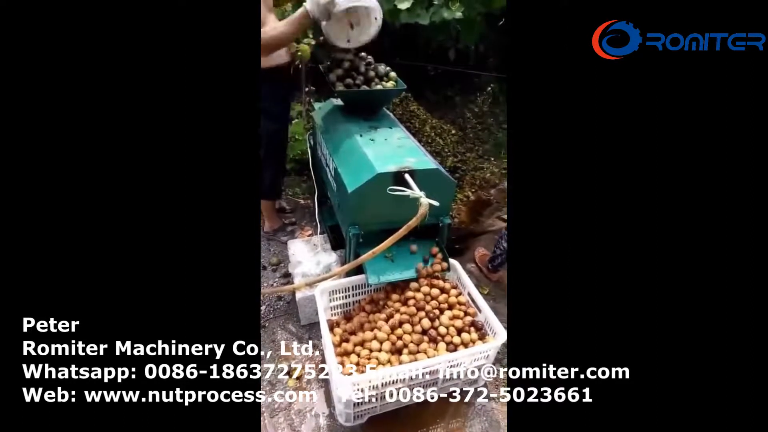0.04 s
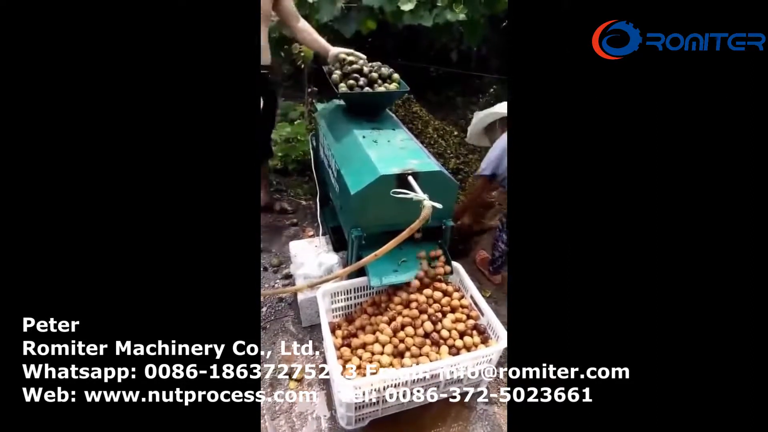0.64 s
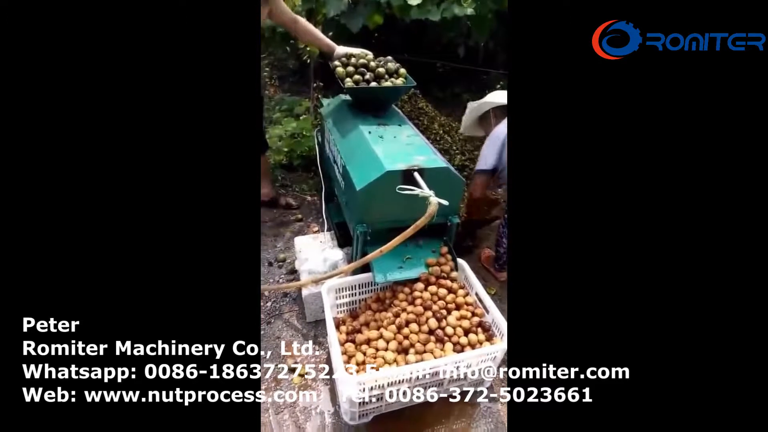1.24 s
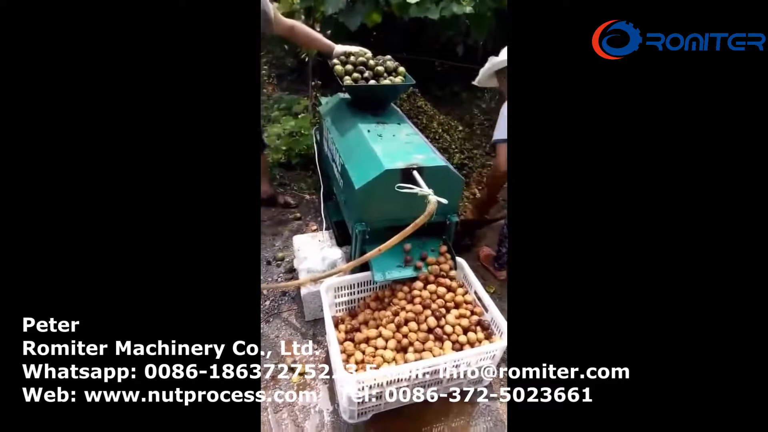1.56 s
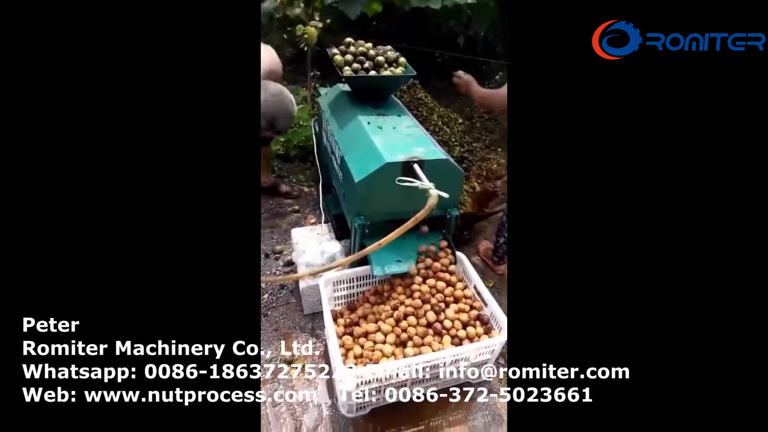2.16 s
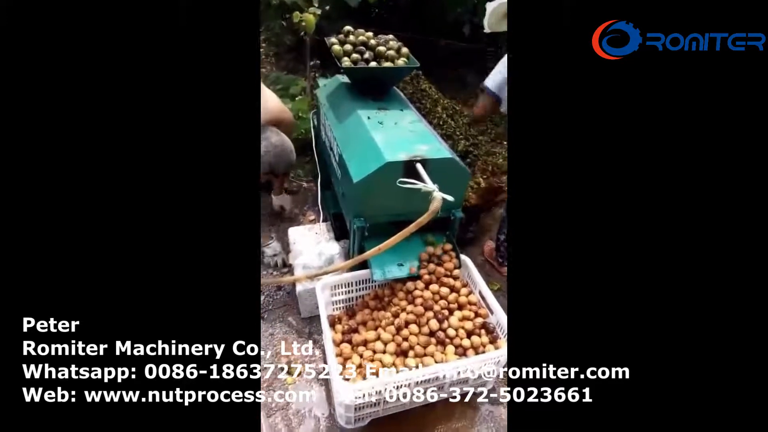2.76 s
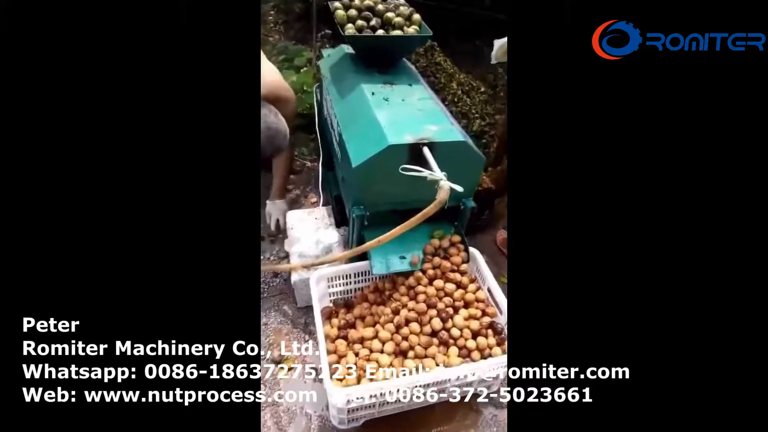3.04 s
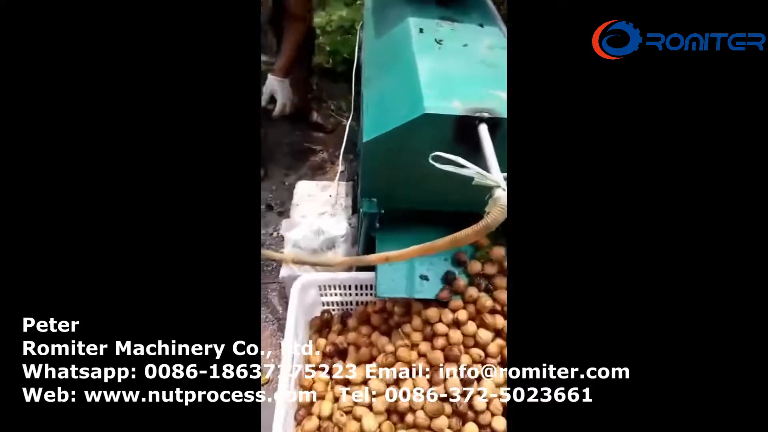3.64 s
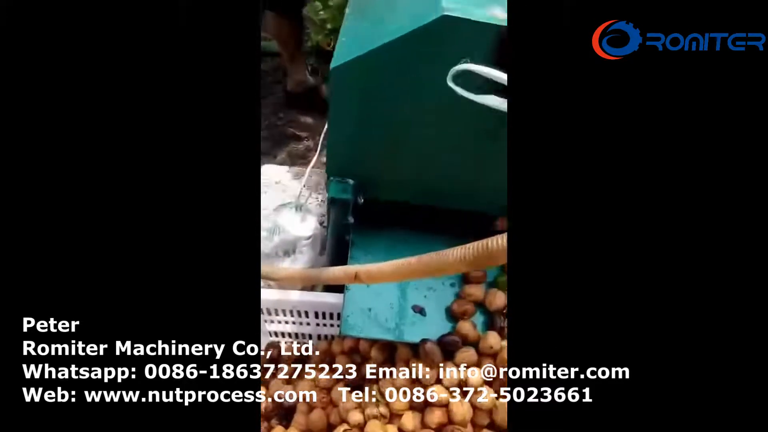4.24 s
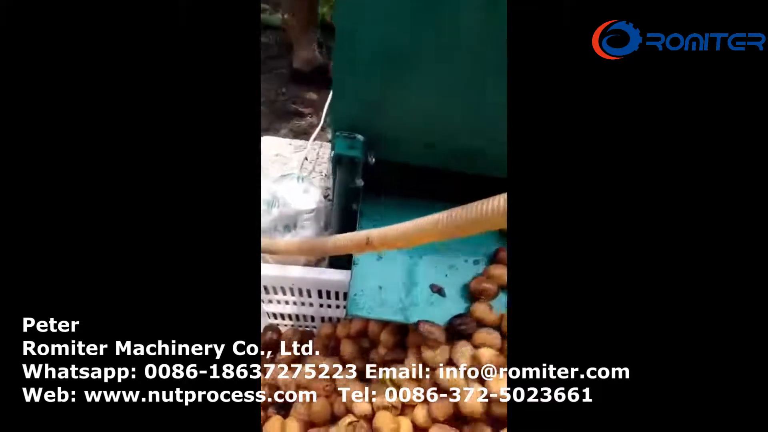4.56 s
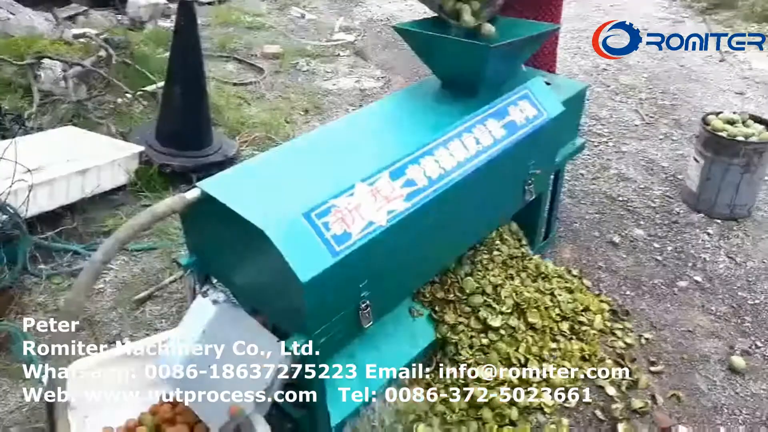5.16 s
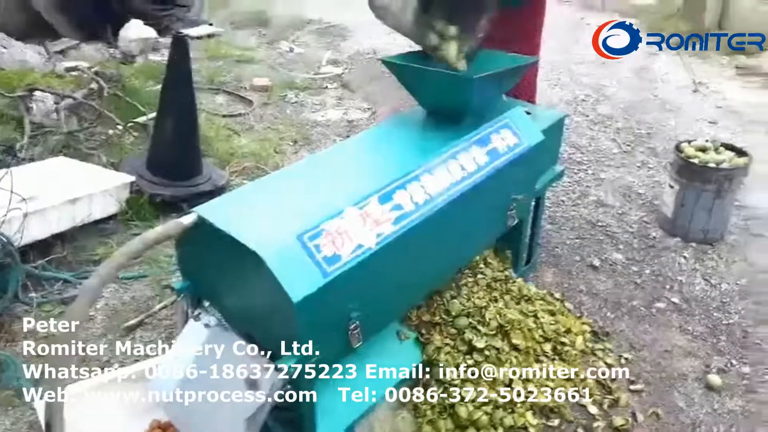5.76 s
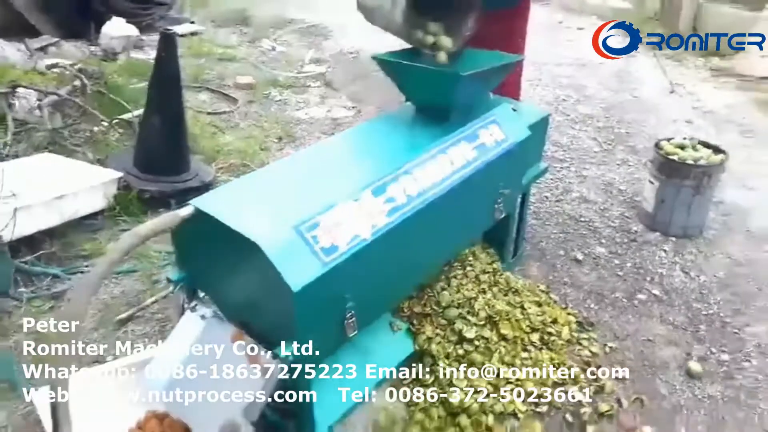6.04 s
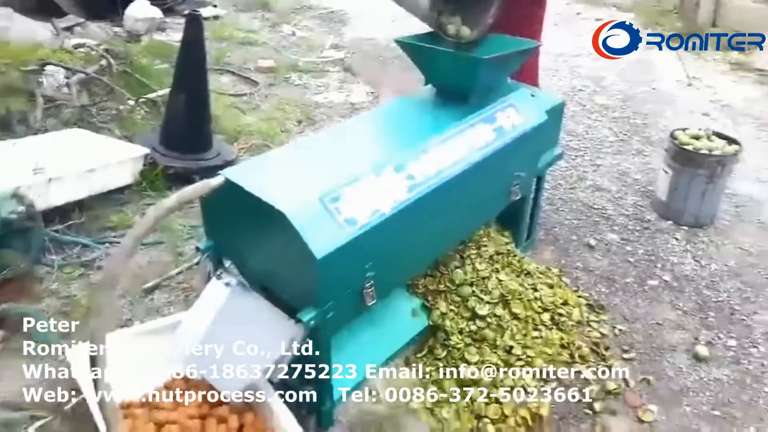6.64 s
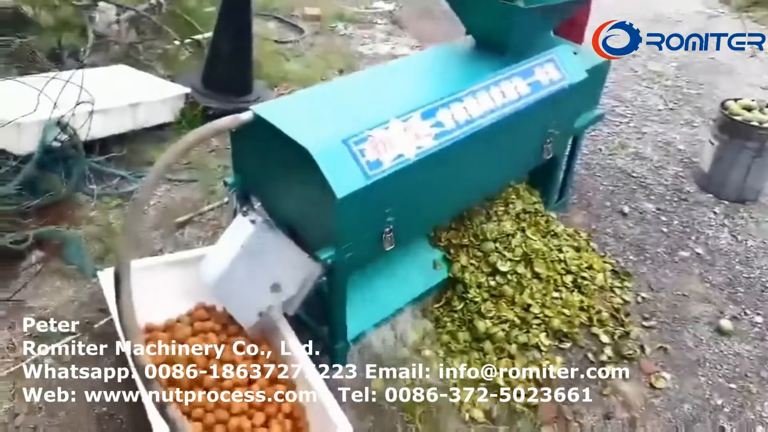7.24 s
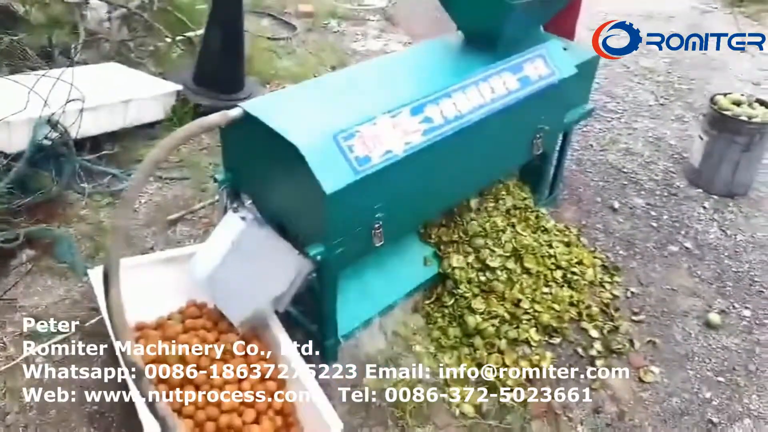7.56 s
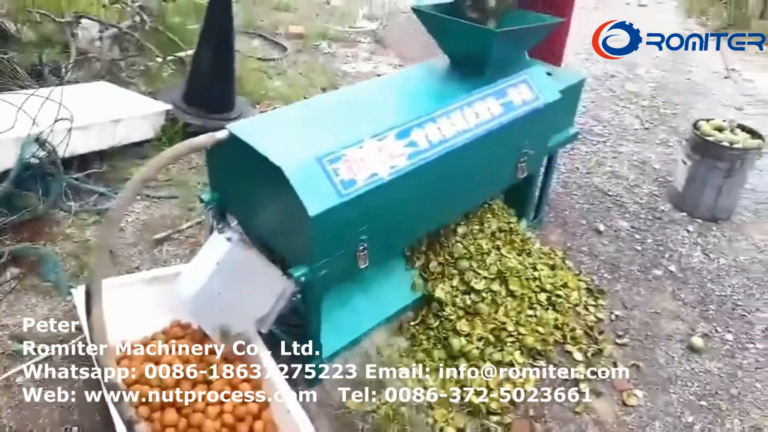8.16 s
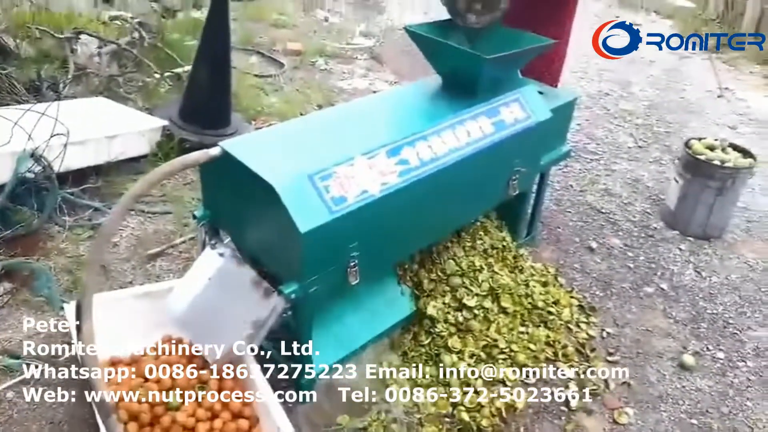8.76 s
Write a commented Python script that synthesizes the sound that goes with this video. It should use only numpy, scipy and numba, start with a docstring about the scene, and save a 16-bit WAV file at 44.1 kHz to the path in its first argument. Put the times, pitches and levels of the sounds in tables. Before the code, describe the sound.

A nut peeling machine runs loudly with nuts rattling in a booming metal drum, then a quieter one drones, churns and clinks.

```python
"""Outdoors, at two walnut peeling machines, heard in turn with a short silence between.
In the first, nuts tumble in a booming sheet-metal drum under a water spray. A hand stirs the hopper,
then the microphone moves in close, swinging past the hollow end of the drum.
The second is duller and quieter: it drones and churns while poured nuts set its steel parts ringing."""
import sys
import numpy as np
from scipy import signal
from scipy.fft import rfft, irfft, next_fast_len
from scipy.io import wavfile
from numba import njit

SR = 44100
rng = np.random.default_rng(int(sys.argv[2]) if len(sys.argv) > 2 else 0)


def master(y):
    """Save y as 16-bit WAV."""
    cut = np.clip(np.atleast_2d(y).T, -1, 1)
    pcm = np.round(cut * 32767)  # scale
    wavfile.write(sys.argv[1], SR, pcm.astype(np.int16))


N = 392931
TIME = np.arange(N) / SR

FIRST_ENDS_S, SECOND_STARTS_S = 5.091, 5.3
FIRST_CUTOFF_HZ, CUTOFF_HZ = 6340, 14150
STIR_AT_S, STIR_ATTACK_S, STIR_HOLD_S = 1.187, 0.019, 0.13
BUNCHING_HZ = 11  # the nuts bunch up and thin out at random

# hard knocks of nuts in the first drum: t/s, clack level/dB, ring level/dB, ring f/Hz
DRUM_KNOCKS = [(0.338, -4, -23.5, 3920), (0.35, -22, -19, 887), (0.397, -8.5, -19, 548),
               (0.463, -4.5, -30, 1510), (0.60, -1, -29, 920), (1.046, -17, -36, 2120),
               (1.115, 3, -24, 1460), (1.594, -2, -19, 556), (1.746, -4.5, -21, 1420),
               (1.94, -4.5, -32, 2670), (2.012, 0, -21.5, 2150), (2.226, -6.5, -25, 1000),
               (2.448, 0, -33, 2600), (2.941, -2, -18, 893), (3.076, -11.5, -20, 884),
               (3.203, -2.5, -18.5, 625), (3.404, -4, -21, 1620), (3.432, -15, -16, 854),
               (3.782, -8.5, -21, 2160), (3.962, -7, -16, 2220), (4.205, -11.5, -19.5, 2490),
               (4.261, 2, -21, 910), (4.441, -9.5, -20, 2210), (4.801, -4, -24, 1380)]
# nuts hitting the second machine's steel: t/s, then level/dB of clatter, ring, shell snap, wet splash
STEEL_HITS = [(5.308, -23, -25, -30, -41), (5.513, -24, -24, -24, -39), (5.587, -37, -22.5, -30, -35),
              (5.745, -36, -24.5, -32, -47), (5.777, -37, -27, -19, -36), (5.86, -28, -27, -20, -43),
              (6.112, -22.5, -23.5, -21, -39), (6.236, -36, -31, -23, -37), (6.405, -27, -30, -26, -41),
              (6.777, -28, -31, -30, -37), (6.962, -29, -32, -30, -39), (7.73, -20, -42, -26, -41),
              (7.812, -31, -35, -28, -40), (7.969, -24.5, -30, -27, -44), (8.084, -29, -34, -34, -36),
              (8.224, -25, -34, -30, -39), (8.425, -34, -41, -37, -38), (8.706, -28, -27, -29, -35.5)]


def first_machine():
    """Wet nuts tumble against a turning drum as the microphone closes in. Returns mid and side."""
    # spectra of the tumbling nuts and of the spray's stereo spread: f/Hz, level/dB
    tumble_spectrum = [(170, 4), (240, 5.5), (360, -5), (500, 4), (610, 2.5), (700, 2.5), (860, 4),
                       (1070, 0), (1300, 0.5), (2150, 0.5), (3000, -9.5), (3900, -23.5), (4600, -21)]
    scatter_spectrum = [(600, -38.5), (1300, 2.5), (2300, 12.5), (4000, 8), (6000, -4)]
    close = ramp(2.56, 3.95)  # the microphone moves in at an even pace
    bunching = surges(BUNCHING_HZ)
    knocked = jostle(DRUM_KNOCKS, share_db=-12.5)
    load = from_db(-28 + 5.44 * close + 0.52 * bunching) * knocked
    water = from_db(-27 + 3.06 * close + 1.03 * bunching) * knocked
    clatter = rms_one(rattle(per_s=900, spread_db=3.5, t60=.07, variety_db=1.5))
    nuts = clatter + from_db(-3.5) * shells(per_s=1600, spread_db=4, t60=.065)
    strays = from_db(-10) * shells(per_s=90, spread_db=3, t60=.31)  # single nuts that ring on
    tumble = load * coloured(nuts + strays, tumble_spectrum)
    boom = drum(nuts, load, close)
    drops = rms_one(rattle(per_s=1500, spread_db=3, t60=.025, variety_db=1.5))
    spray = water * water_spray(drops, nuts, strays)
    body = tumble + boom + spray + hopper(clatter) + knocks() + rumble(close)
    scatter = water * from_db(-29) * coloured(white(), scatter_spectrum)
    return low_pass(body, FIRST_CUTOFF_HZ) + thin_hiss(drops, water), scatter


def drum(nuts, load, close):
    """The sheet metal booms, harder once every turn; the air inside rings hollow."""
    # modes of the drum (lowest, panels, shell, air inside, mouth): f/Hz, width/Hz, level/dB
    low_mode = [(134.1, 21.6, 0)]
    panel_modes = [(285.3, 28, 0.5), (331, 72, -2)]
    shell_modes = [(551, 32, -46), (606, 55, -40.5), (899, 42, -42), (1467, 55, -48), (2130, 40, -48),
                   (2620, 210, -45)]
    air_mode = [(812, 204, -44)]
    mouth_mode = [(444, 170, -37.5), (1070, 300, -47.5)]
    turns_per_s, heaviest_at_s = 2.0, .208
    pass_at_s, pass_width_s = 3.15, 0.5  # the microphone swings past the drum's end
    turn_db = 1.5 * np.cos(2 * np.pi * turns_per_s * (TIME - heaviest_at_s))
    unfed = 1 - ramp(STIR_AT_S, STIR_AT_S + STIR_HOLD_S)  # less boom until the hand feeds nuts in
    low = from_db(-36 + 0.5 * close + turn_db) * resonate(white(), low_mode)
    panels = from_db(-36.5 + 5.1 * close + 0.61 * turn_db - 3.5 * unfed) * resonate(nuts, panel_modes)
    hollow = from_db(8 * swell(pass_at_s, pass_width_s)) * resonate(nuts, air_mode)
    # close up, the microphone hears less of the shell and more of the mouth
    shell = from_db(-2.5 * close) * resonate(nuts, shell_modes)
    mouth = (load / load.mean()) ** 2.5 * resonate(nuts, mouth_mode)
    return low + panels + hollow + shell + mouth


def water_spray(drops, nuts, strays):
    """Drops patter over the tumbling nuts."""
    # spectrum of the spray: f/Hz, level/dB
    spray_spectrum = [(3000, -8), (4200, -8), (4900, -5), (5600, -0.5), (6300, -2)]
    return coloured(drops + .49 * nuts + .5 * strays, spray_spectrum)


def knocks():
    """A nut hits the first drum hard: a dry clack and a short ring of the drum's shell."""
    s, clack_db, ring_db, hz = np.transpose(DRUM_KNOCKS)
    band = signal.butter(2, [1100, 5500], "band", fs=SR, output="sos")
    clacks = signal.sosfilt(band, impacts(s, clack_db - 13, t60=.05, variety_db=1))
    return clacks + notes(zip(s, ring_db, hz), attack_s=.0005, t60=.1, partner=1.09, partner_db=-13)


def hopper(clatter):
    """A hand rolls the nuts in the hopper: one low stroke that holds, then fades."""
    # spectrum of the stirred nuts: f/Hz, level/dB
    hopper_spectrum = [(80, -37), (170, 4), (260, -0.5), (420, -2), (650, -29), (1200, -13)]
    full_s, fade_db_per_s = STIR_AT_S + STIR_ATTACK_S, 60
    fading_s = np.maximum(TIME - full_s - STIR_HOLD_S, 0)
    stroke = ramp(STIR_AT_S, full_s) * from_db(-28.5 - fade_db_per_s * fading_s)
    return stroke * coloured(clatter, hopper_spectrum)


def second_machine():
    """Nuts churn and shed their wet husks over the drone, louder at first as they are poured in."""
    # spectra of the churning nuts and the shredded husks: f/Hz, level/dB
    churn_spectrum = [(220, -7), (380, -5.5), (437, -11), (471, -35), (652, -9), (758, -4.5), (1020, -4),
                      (1260, -5), (1460, -12.5), (1800, -9), (2890, -18.5), (3250, -25.5), (3600, -24.5),
                      (5000, -30.5), (6500, -57)]
    husk_spectrum = [(2060, -2), (3500, -3.5), (3940, -5), (5340, -5), (6650, -4.5), (8800, -7),
                     (13400, -4.5), (14500, -11)]
    pour = 1 - ramp(SECOND_STARTS_S, SECOND_STARTS_S + 2.2)
    bunching = jostle(STEEL_HITS, share_db=14) * from_db(0.7 * surges(BUNCHING_HZ))
    clatter = rms_one(rattle(per_s=900, spread_db=3, t60=.15, variety_db=1.5))
    nuts = clatter + from_db(-5) * shells(per_s=1400, spread_db=4, t60=.07)
    churn = from_db(-30 + 1.4 * pour) * bunching * coloured(nuts, churn_spectrum)
    drone = drive(pour)
    shreds = rattle(per_s=1200, spread_db=6, t60=.08, variety_db=1)
    husks = from_db(-42 + 0.43 * pour) * bunching * coloured(shreds, husk_spectrum)
    return churn + drone + husks + hard_hits() + steel_ring() + loose_part()


def hard_hits():
    """Nuts land on the steel with a dull clatter, a snap of the shell and a wet splash."""
    s, clatter_db, _, snap_db, splash_db = np.transpose(STEEL_HITS)
    dull = signal.butter(2, 2340, fs=SR, output="sos")
    crisp = signal.butter(2, [2150, 3700], "band", fs=SR, output="sos")
    wet = signal.butter(2, 4500, "high", fs=SR, output="sos")
    clatter = signal.sosfilt(dull, impacts(s, clatter_db, t60=.68, variety_db=4))
    snap = signal.sosfilt(np.vstack([crisp, crisp]), impacts(s, snap_db, t60=.25, variety_db=2.5))
    splash = signal.sosfilt(wet, impacts(s, splash_db, t60=.28, variety_db=2.5))
    return clatter + snap + splash


def steel_ring():
    """Each hard hit rings the steel's modes; the thick of the pour keeps them sounding."""
    # modes of the steel: f/Hz, level/dB, t60/s
    steel_modes = [(563, -18, 3.3), (780, -13, 0.8), (1009, -1.5, 0.66), (1288, -10.5, 0.72),
                   (1970, -11.5, 0.44), (2240, -11.5, 0.37), (2977, -21, 0.65), (3070, -25, 0.4),
                   (3445, -18, 0.5), (3650, -22, 0.35), (4572, -24.5, 0.5)]
    s, _, ring_db, _, _ = np.transpose(STEEL_HITS)
    stream = from_db(-34) * swell(at_s=5.7, width_s=.24)
    out, variety_db = np.zeros(N), 2
    for hz, db, t60 in steel_modes:
        force = from_db(ring_db + variety_db * rng.standard_normal(len(s)))
        energy = stored_energy(s, force, t60) + stream ** 2
        waver = .5 * rms_one(ring(white(), hz, t60=.08))  # bouncing nuts keep restriking the steel
        out += from_db(db) * np.sqrt(energy) * (np.sin(2 * np.pi * hz * TIME) + waver)
    return out


def loose_part():
    """Single nuts hit a loose part, which pings and rattles as it rings."""
    # pings: t/s, level/dB, f/Hz
    pings = [(5.312, -28, 3440), (5.369, -14.5, 1739), (5.485, -21, 1745), (5.52, -27, 3445),
             (5.594, -40, 3445), (5.765, -28, 3440), (6.113, -29.5, 3440), (6.24, -34, 3440),
             (6.408, -31.5, 3440), (8.703, -36, 3445), (8.76, -33, 3440)]
    rattling = from_db(2.5 * surges(130))
    return rattling * notes(pings, attack_s=.006, t60=.3, partner=1.011, partner_db=-30)


def thumps():
    """Soft, heavy blows on either casing: each swells into a low panel mode and dies away."""
    # blows: t/s, level/dB, f/Hz, t60/s
    blows = [(0.566, -9, 268, 0.036), (1.295, -13, 298, 0.073), (1.703, -9, 285, 0.16),
             (3.782, -9, 323, 0.041), (4.621, -20, 175, 0.1), (5.001, -16, 275.3, 0.38),
             (5.864, -17, 234, 0.14), (6.372, -24, 201, 0.35), (7.423, -25, 220, 0.31),
             (7.681, -27, 205, 0.31), (7.87, -25, 195, 0.62), (8.654, -18.5, 326, 0.084)]
    out, age = np.zeros(N), TIME[:SR // 4]
    for s, db, hz, t60 in blows:
        envelope = from_db(db) * strike_envelope(age, attack_s=.5 / hz, t60=t60)
        add_at(out, s, envelope * np.sin(2 * np.pi * hz * age))
    return out


def scrapes():
    """Shells scrape or crack: each is a short hiss in a narrow band."""
    # scrapes and cracks: t/s, level/dB, f/Hz, t60/s
    cracks = [(0.38, -24, 5100, .3), (0.473, -24, 5300, .1), (3.81, -22, 5500, .1), (4.755, -19, 5500, .06),
              (6.236, -28, 3000, .14), (6.236, -29, 13500, .05)]
    out, age = np.zeros(N), TIME[:SR // 2]
    for s, db, hz, t60 in cracks:
        band = signal.butter(3, [hz / 1.12, hz * 1.12], "band", fs=SR, output="sos")
        hiss = rms_one(signal.sosfilt(band, rng.standard_normal(len(age))))
        add_at(out, s, from_db(db) * hiss * strike_envelope(age, attack_s=.002, t60=t60))
    return out


def drive(pour):
    """The second machine's drive shakes its casing into a low drone."""
    # modes of the casing: f/Hz, width/Hz, level/dB
    casing_modes = [(132.6, 31, -20), (214, 45, -5), (267, 37, -4.5), (317, 28, -1.5)]
    # spectrum of the drone: f/Hz, level/dB
    drone_spectrum = [(25, -30), (50, -33), (75, -13), (100, -9.5), (180, 0), (380, -10.5), (550, -7.5),
                      (1000, -46)]
    casing = resonate(white(), casing_modes)
    return from_db(-36 + 2.6 * pour) * (casing + from_db(1) * coloured(white(), drone_spectrum))


def rumble(close):
    """A low rumble under the first machine grows as the microphone nears."""
    # spectrum of the rumble: f/Hz, level/dB
    rumble_spectrum = [(20, -0.5), (45, -7), (62, -25), (85, 8), (110, 0.5), (200, -4), (500, -5.5)]
    return from_db(-46 + 4.2 * close) * coloured(white(), rumble_spectrum)


def air():
    """A thin hiss that gives the second machine its width."""
    # spectrum of the hiss: f/Hz, level/dB
    air_spectrum = [(1100, -32), (1960, 5), (7190, -1), (8160, 11), (14000, -11)]
    return from_db(-53.5) * coloured(white(), air_spectrum)


def thin_hiss(texture, spray_gain):
    """The microphone's signal chain adds a faint hiss at 8-10 kHz that follows the spray's level."""
    # spectrum of the hiss: f/Hz, level/dB
    hiss_spectrum = [(7000, -55.5), (8200, -8), (8800, 7), (10000, 15), (10250, 0), (10600, -41)]
    return from_db(-35) * spray_gain * coloured(texture, hiss_spectrum)


def noise_floor():
    """Very faint steady noise, separate in each channel."""
    # spectrum of the background: f/Hz, level/dB
    floor_spectrum = [(20, -6), (60, -3.5), (150, -17.5), (500, -17), (5000, -22.5)]
    return from_db(-77.5) * coloured(rng.standard_normal((2, N)), floor_spectrum)


def shells(per_s, spread_db, t60):
    """Nuts collide at random, each ringing briefly at a pitch set by its size; rms 1."""
    when, size, force, sign = rng.random((per_s * N // SR, 4)).T
    hz = 380 * (6200 / 380) ** size
    decay_s = t60 / np.hypot(1, hz / 2000)  # high pitches die sooner
    height = from_db(spread_db * (2 * force - 1)) * np.sign(sign - .5) * np.sqrt(hz / decay_s)
    keeps, step = from_db(-60 / (decay_s * SR)), 2 * np.pi * hz / SR
    starts, lengths = (when * N).astype(int), (.7 * decay_s * SR).astype(int)
    feedback = 2 * keeps * np.cos(step)
    return rms_one(dying_sines(starts, feedback, keeps, height * np.sin(step), lengths, N))


def rattle(per_s, spread_db, t60, variety_db):
    """Unpitched collisions at random moments and with random force."""
    total = per_s * N // SR
    force_db = spread_db * rng.uniform(-1, 1, total)
    return impacts(rng.uniform(0, N / SR, total), force_db, t60, variety_db)


def impacts(times, level_db, t60, variety_db):
    """Each impact excites a crowd of short modes: a dying burst with its own strength in every band."""
    edges_hz = np.geomspace(120, 16000, num=8)
    noises, out = [white(), white()], np.zeros(N)
    for k, (low, high) in enumerate(zip(edges_hz, edges_hz[1:])):
        force = from_db(level_db + variety_db * rng.standard_normal(len(times)))
        band = signal.butter(2, [low, high], "band", fs=SR, output="sos")
        out += signal.sosfilt(band, noises[k % 2] * np.sqrt(stored_energy(times, force, t60)))
    return out


def jostle(hits, share_db, settle_s=.023):
    """A hard hit sets its neighbours rattling: a gain that jumps and settles back to 1."""
    s, db = np.transpose(hits)[:2]
    keep = np.exp(-1 / (settle_s * SR))
    return 1 + signal.lfilter([1], [1, -keep], clicks(s, from_db(db + share_db)) + 1e-18)


def notes(rows, attack_s, t60, partner, partner_db):
    """Each row (t/s, level/dB, f/Hz) strikes two close modes, the second at partner times the pitch."""
    out, age = np.zeros(N), TIME[:SR // 2]
    envelope = strike_envelope(age, attack_s, t60)
    for s, db, hz in rows:
        angle = 2 * np.pi * hz * age
        pair = np.sin(angle) + from_db(partner_db) * np.sin(partner * angle)
        add_at(out, s, from_db(db) * envelope * pair)
    return out


def resonate(x, modes):
    """Parallel resonances with steep skirts, each at its own rms level."""
    out = np.zeros(N)
    for hz, width, db in modes:
        edges_hz = [max(hz - width * .75, 20), hz + width * .75]
        band = signal.butter(1, edges_hz, "band", fs=SR, output="sos")
        out += from_db(db) * rms_one(signal.sosfilt(np.vstack([band, band]), x))
    return out


def ring(x, hz, t60):
    """One mode: a unit click sets a sine of height 1 ringing."""
    keep, step = from_db(-60 / (t60 * SR)), 2 * np.pi * hz / SR
    return signal.lfilter([0, np.sin(step)], [1, -2 * keep * np.cos(step), keep * keep], x + 1e-18)


@njit
def dying_sines(starts, feedback, keeps, firsts, lengths, size):
    """Sum of two-pole rings, each with its own start, pitch, decay, height and length."""
    out = np.zeros(size)
    for k in range(len(starts)):
        now, before = firsts[k], 0.0
        for i in range(starts[k], min(size, starts[k] + lengths[k])):
            out[i] += now
            now, before = feedback[k] * now - keeps[k] * keeps[k] * before, now
    return out


def stored_energy(times, force, t60):
    """Energy that each hit adds to and damping drains."""
    keep = from_db(-120 / (t60 * SR))
    return signal.lfilter([1], [1, -keep], clicks(times, force ** 2) + 1e-18)


def strike_envelope(age, attack_s, t60):
    """A quick rise and an exponential decay."""
    return (1 - np.exp(-age / attack_s)) * from_db(-60 * age / t60)


def clicks(times, heights):
    """One-sample pushes at the given times."""
    return np.bincount(np.clip(np.asarray(times) * SR, 0, N - 1).astype(int), heights, N)


def add_at(out, s, sound):
    """Mix a sound into out from time s."""
    start = int(s * SR)
    out[start:start + len(sound)] += sound[:N - start]


def ramp(start_s, end_s):
    """Rises evenly from 0 to 1 between two times."""
    return np.clip((TIME - start_s) / (end_s - start_s), 0, 1)


def swell(at_s, width_s):
    """A bell curve of height 1."""
    return np.exp(-((TIME - at_s) / width_s) ** 2)


def surges(rate_hz):
    """Random wander, mostly slower than rate_hz; rms 1."""
    return rms_one(filtered(white(), lambda hz: 1 / (1 + (hz / rate_hz) ** 2)))


def coloured(x, spectrum):
    """Shape x by a spectrum that falls away beyond its ends; rms 1."""
    points, db = np.transpose(spectrum)

    def response(hz):
        skirts = np.minimum(1, np.minimum(hz / points[0], points[-1] / hz)) ** 6
        return from_db(np.interp(np.log(hz), np.log(points), db)) * skirts
    return rms_one(filtered(x, response))


def low_pass(x, edge_hz):
    """A very steep band edge."""
    return filtered(x, lambda hz: 1 / np.sqrt(1 + (hz / edge_hz) ** 400))


def filtered(x, response):
    """Apply a response given as a function of frequency."""
    size = next_fast_len(N + SR // 2)
    hz = np.maximum(np.arange(size // 2 + 1) * SR / size, 1)
    return irfft(rfft(x, size) * response(hz), size)[..., :N]


def white():
    """Fresh white noise."""
    return rng.standard_normal(N)


def from_db(db):
    """Decibels to gain."""
    return 10 ** (np.asarray(db) / 20)


def rms_one(x):
    """Scale to an rms of 1."""
    return x / np.sqrt(np.mean(x ** 2) + 1e-20)


def scene():
    """The machines sound in turn, almost straight ahead of the microphone."""
    fade_s = .006
    first_on = 1 - ramp(FIRST_ENDS_S, FIRST_ENDS_S + fade_s)
    second_on = ramp(SECOND_STARTS_S - fade_s / 2, SECOND_STARTS_S + fade_s / 2)
    blows = thumps() + scrapes()
    mid, scatter = first_machine()
    first = first_on * (mid + low_pass(blows, FIRST_CUTOFF_HZ))
    second = second_on * (second_machine() + blows)
    tick = clicks([1.214], from_db([-15]))  # one small, sharp tick
    treble = signal.butter(2, 1150, "high", fs=SR, output="sos")
    lean = from_db(-27) * signal.sosfilt(treble, first)  # the first machine's treble leans right
    side = lean + first_on * scatter + second_on * air()
    return first + second + tick + noise_floor() + np.array([-side, side])


def record(dry):
    """The top is cut steeply."""
    return low_pass(dry, CUTOFF_HZ)


dry = scene()
out = record(dry)
master(out)
```